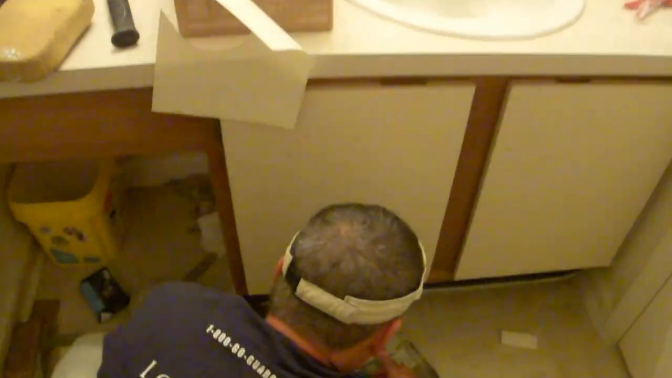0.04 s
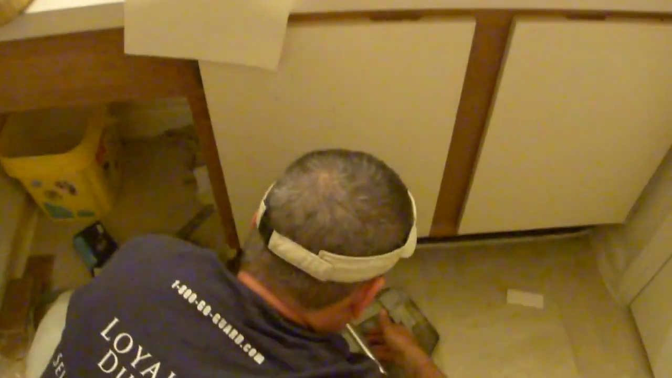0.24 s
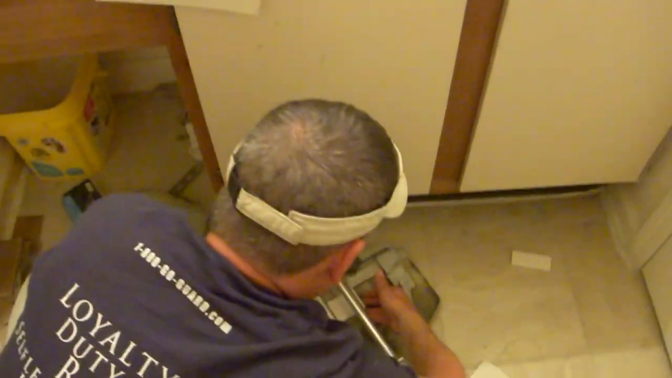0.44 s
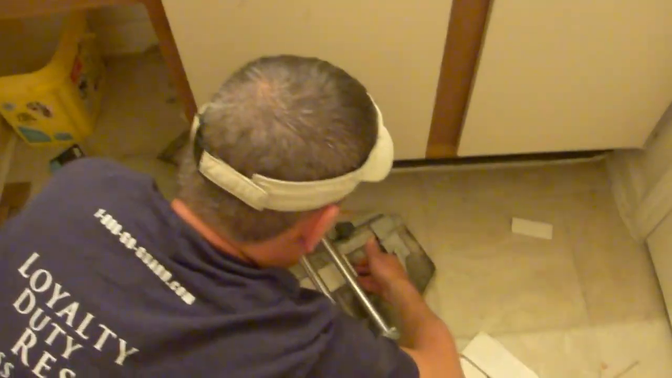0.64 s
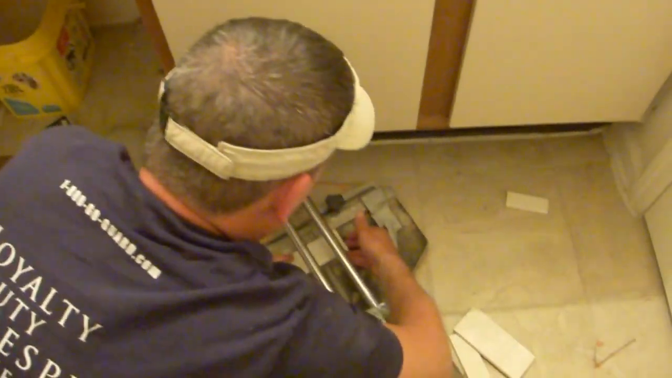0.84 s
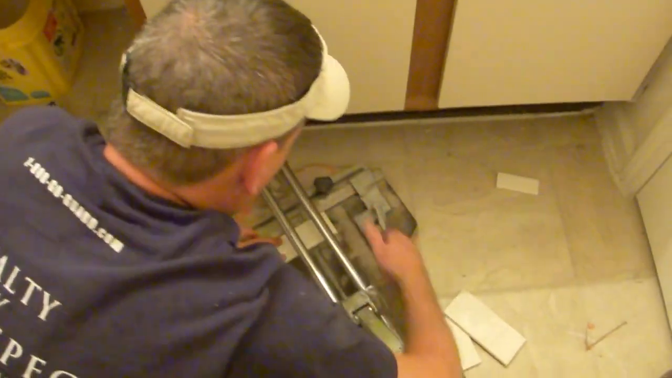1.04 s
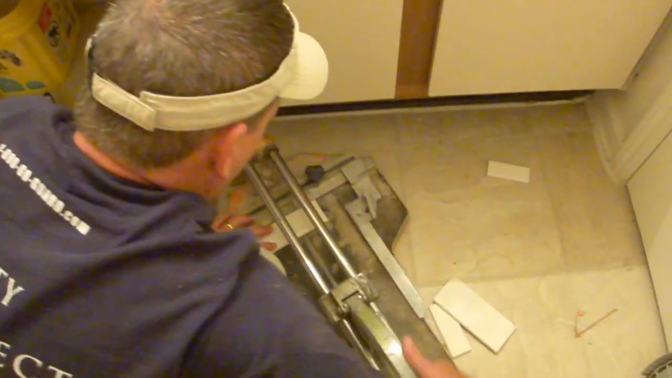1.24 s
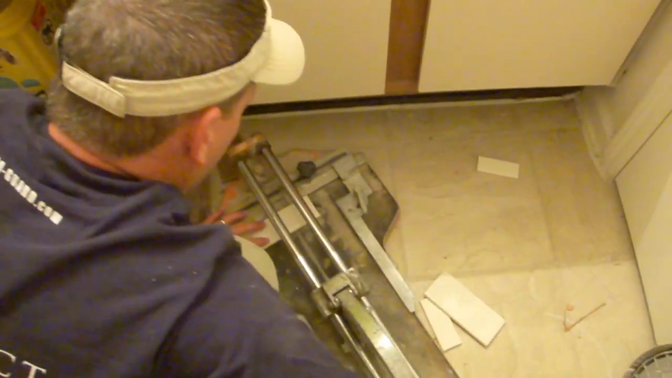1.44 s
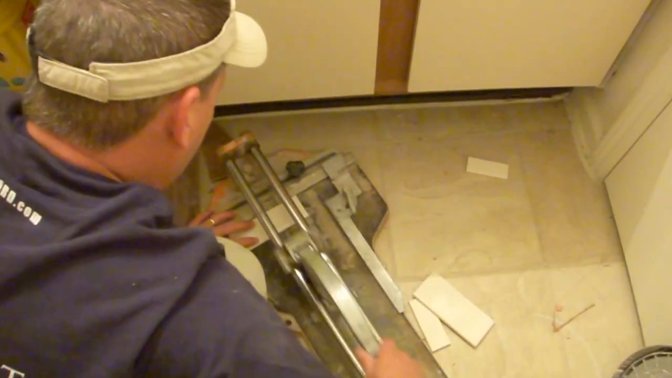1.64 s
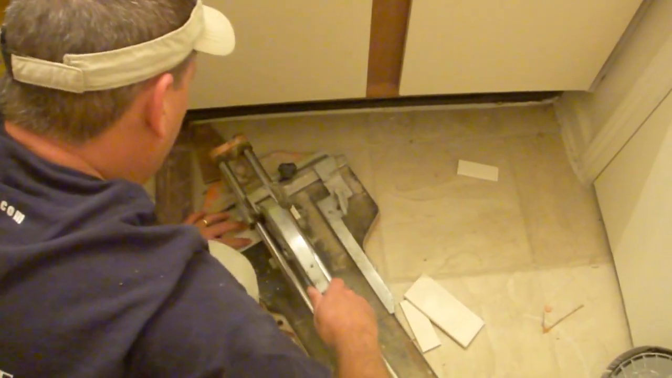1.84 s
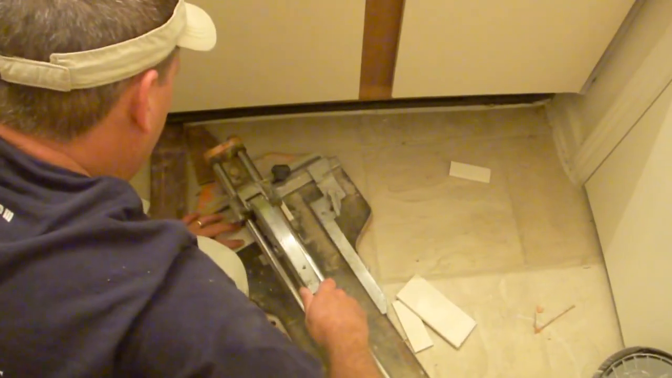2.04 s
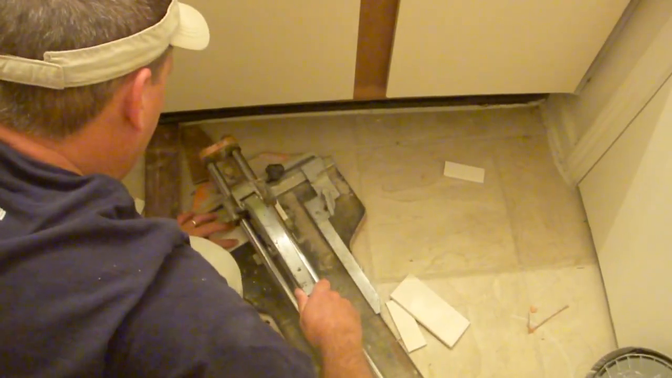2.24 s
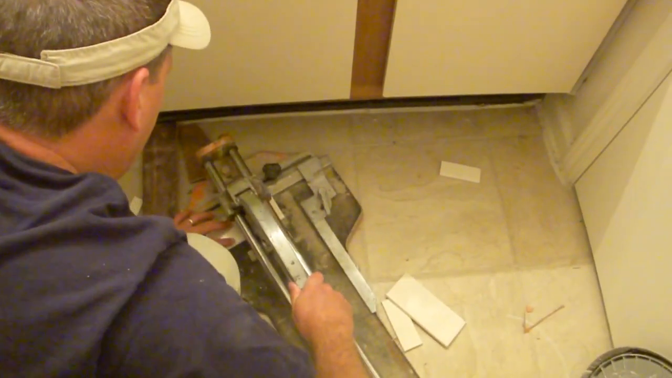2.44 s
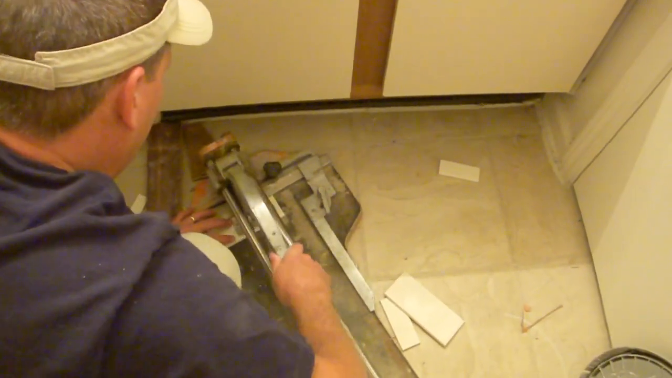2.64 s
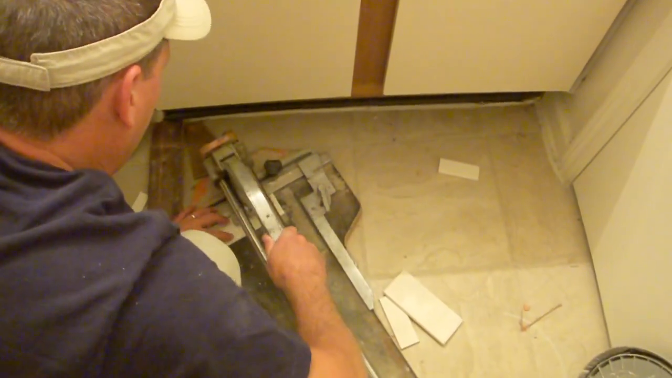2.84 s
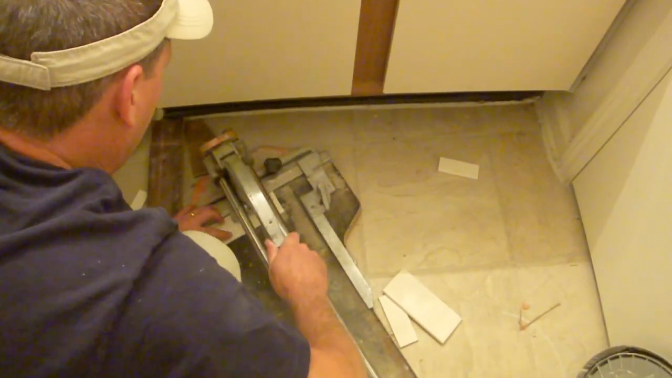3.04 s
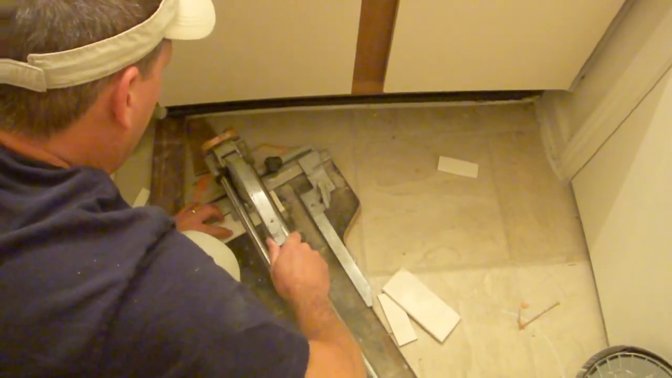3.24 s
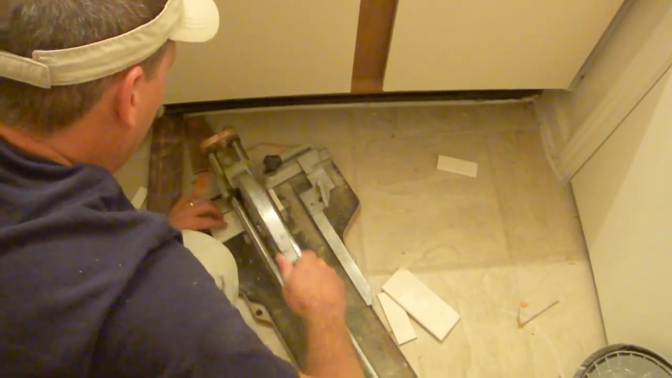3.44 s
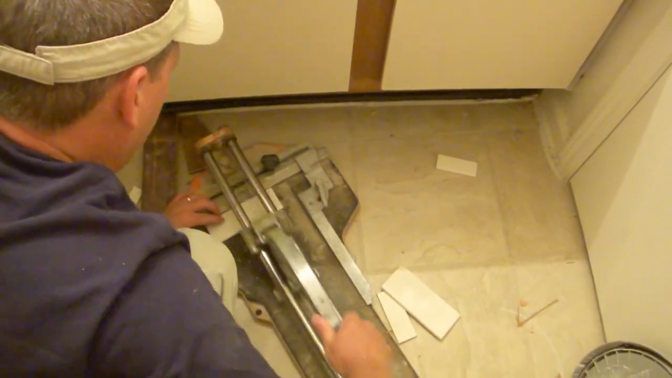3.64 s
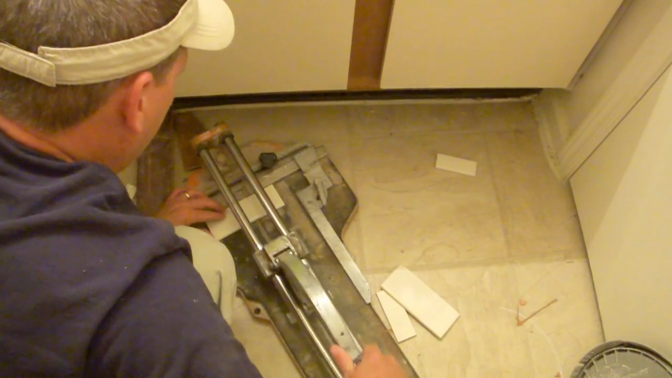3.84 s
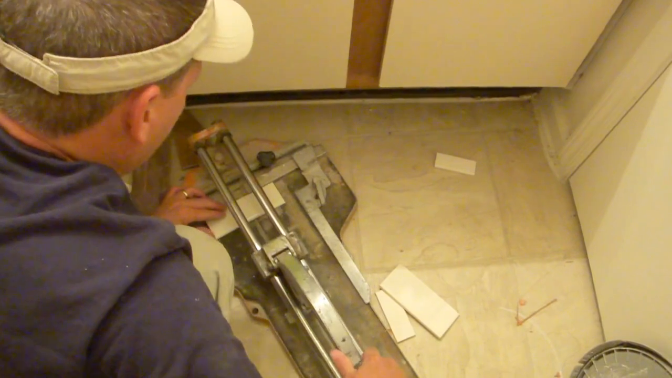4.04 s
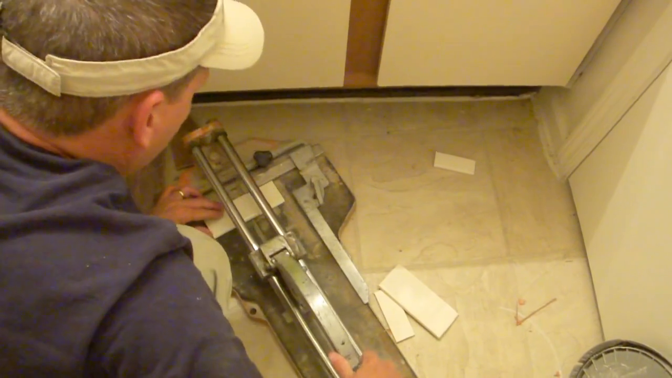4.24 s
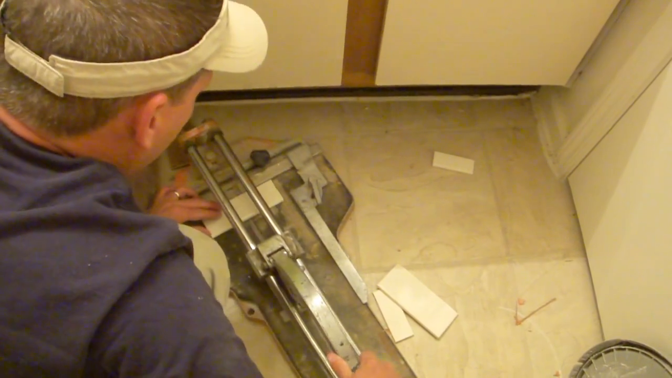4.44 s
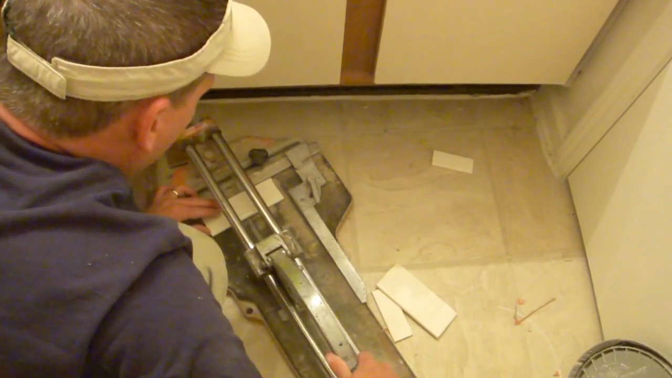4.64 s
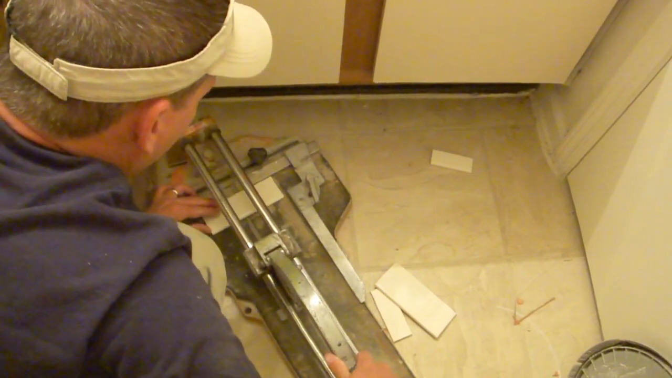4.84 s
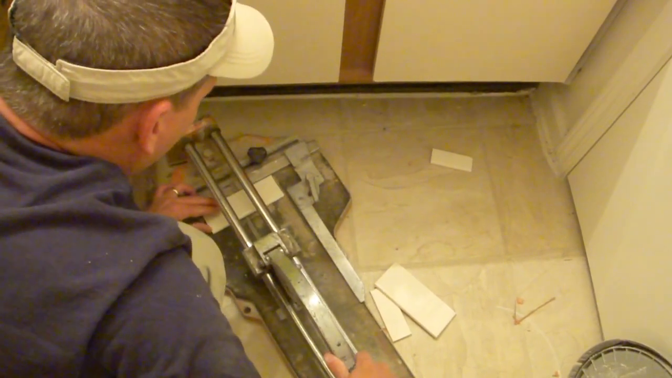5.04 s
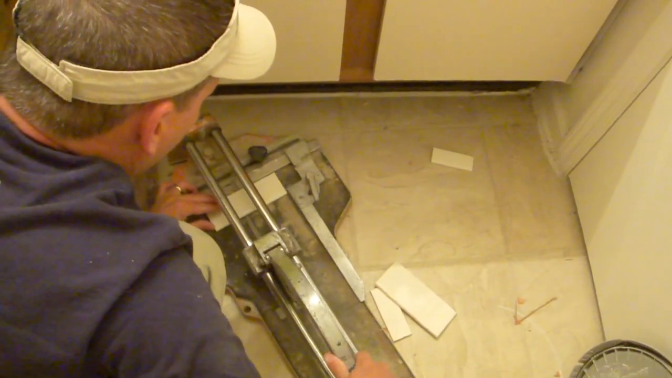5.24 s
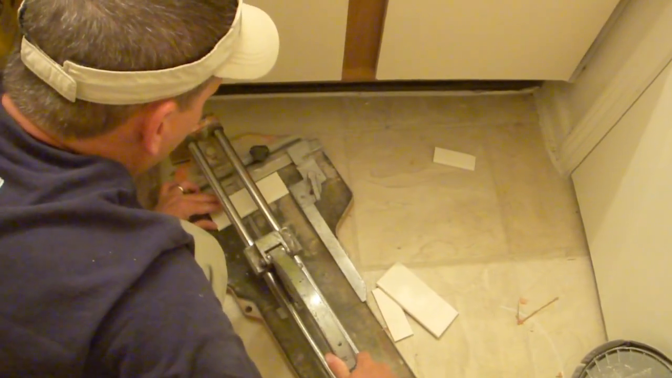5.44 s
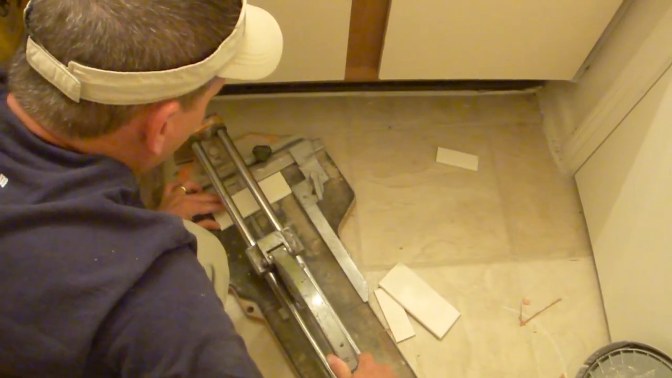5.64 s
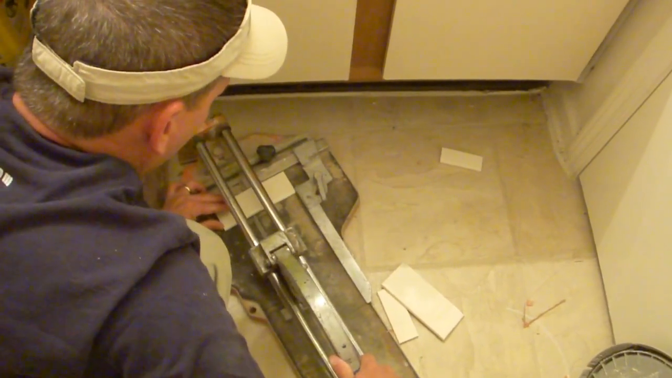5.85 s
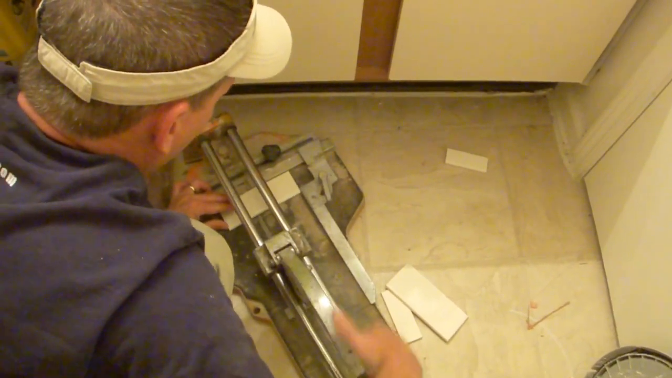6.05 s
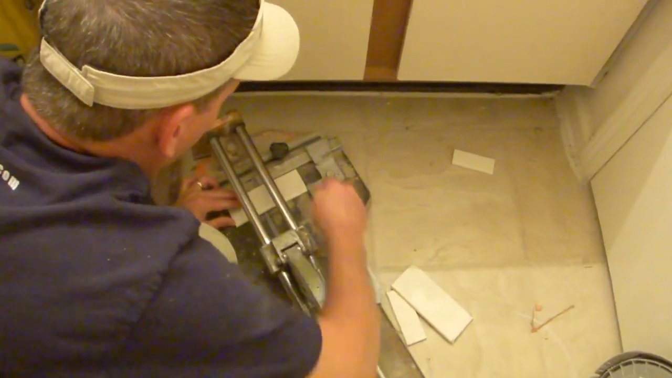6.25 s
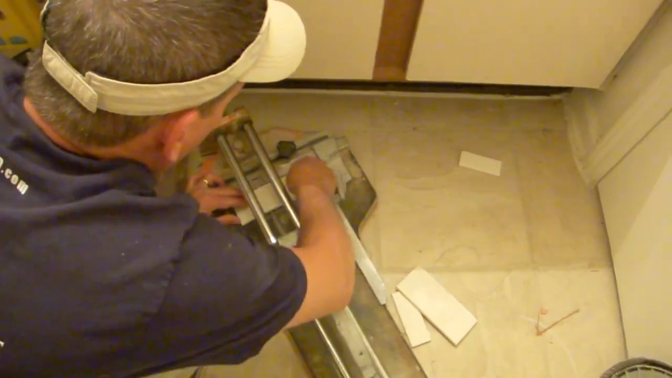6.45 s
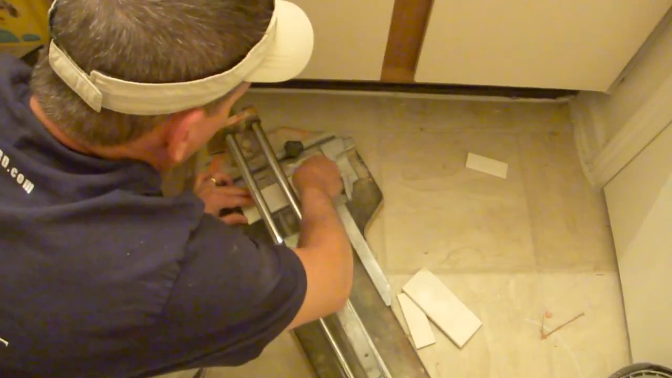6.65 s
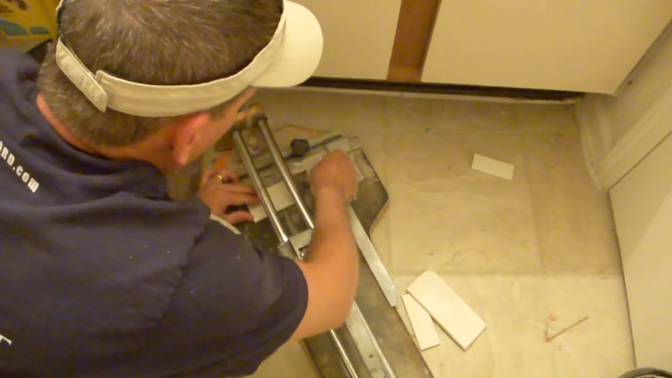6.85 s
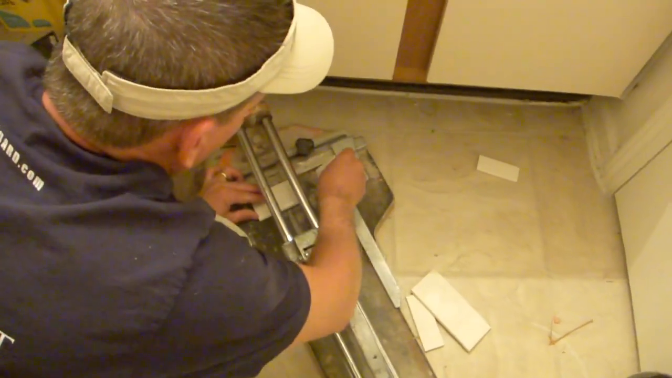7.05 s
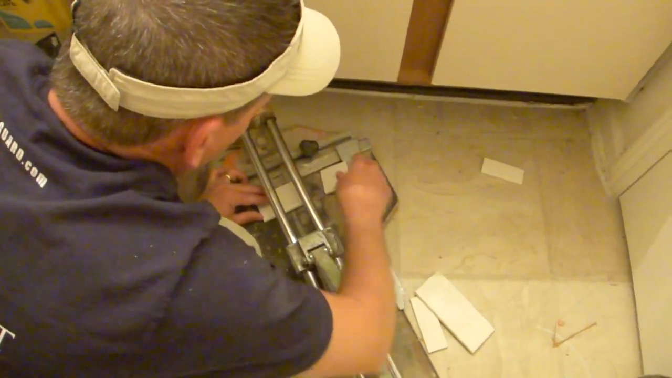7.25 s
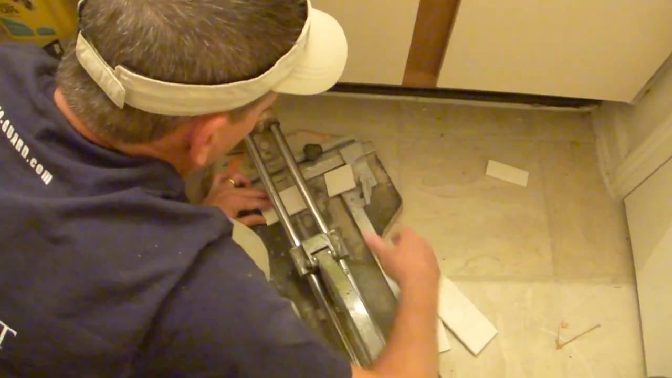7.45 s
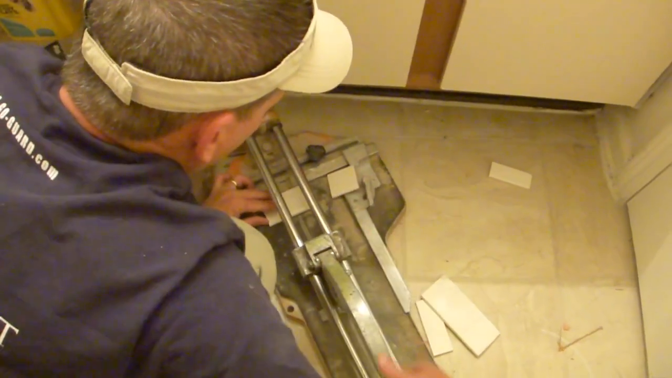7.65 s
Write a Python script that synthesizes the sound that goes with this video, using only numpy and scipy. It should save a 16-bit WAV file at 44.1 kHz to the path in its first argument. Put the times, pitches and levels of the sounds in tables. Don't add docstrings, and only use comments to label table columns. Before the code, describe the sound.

A manual tile cutter is worked at close range by thin-sounding small microphones. Soft scuffs come first, then a bumpy metal roll, knocks, a brief crushing scrape of glaze, hard handle blows and another rolling stroke. A quieter passage has faint tile scuffs and ticks, then a solid knock, scraping and glassy tile clinks. Short bright room reverberation, faint hiss and hum.

```python
import sys
import numpy as np
from scipy import signal
from scipy.fft import rfft, irfft, next_fast_len
from scipy.io import wavfile
from scipy.ndimage import map_coordinates

SR = 44100
rng = np.random.default_rng(int(sys.argv[2]) if len(sys.argv) > 2 else 0)


def rack_gain(trim_db):
    fader = np.asarray(trim_db, float)
    return 10 ** (fader / 20)


def store_wav(level_fs):
    pcm = np.round(np.clip(np.atleast_2d(level_fs), -1, 1) * 32767)
    wavfile.write(sys.argv[1], SR, pcm.T.astype(np.int16))


N = 340011
T = np.arange(N) / SR


def unit(x):
    return x / np.sqrt(np.mean(x ** 2) + 1e-20)


def along(points, hz):
    f, v = np.transpose(points)
    return np.interp(np.log(hz + 1), np.log(f + 1), v)


def wobble(rate):
    return map_coordinates(rng.standard_normal(int(N * rate / SR) + 4), [T * rate])


def filtered(x, response):
    m = next_fast_len(x.shape[-1] + SR // 2)
    spectrum = rfft(x, m) * response(np.fft.rfftfreq(m, 1 / SR))
    return irfft(spectrum, m)[..., :x.shape[-1]]


def body(modes):
    def response(f):
        total = 0
        for k, (centre, width, db) in enumerate(modes):
            resonance = 1j * f * width / (centre * centre - f * f + 1j * f * width)
            total = total + (-1) ** k * rack_gain(db) * resonance
        return total
    return response


def colour(spectrum):
    return lambda hz: rack_gain(along(spectrum, hz))


def band(centre_hz, q):
    return lambda f: (1j * f * centre_hz / q / (centre_hz ** 2 - f * f + 1j * f * centre_hz / q)) ** 2


def grains(per_s, spread_db):
    touch = rng.random(N) < per_s / SR
    return touch * rng.standard_normal(N) * rack_gain(spread_db * rng.standard_normal(N))


def pair(alike, hz):
    turn = np.arccos(np.clip(along(alike, hz), -1, 1)) / 2
    return np.array([np.cos(turn), np.sin(turn)])


def swells(rows, rise_db_per_s, fall_db_per_s, sag_db_per_s):
    start, held, db = np.transpose(rows)[:3, :, None]
    since = T - start
    rise = rise_db_per_s * np.minimum(since, 0)
    sag = sag_db_per_s * np.clip(since, 0, held)
    fall = fall_db_per_s * np.maximum(since - held, 0)
    return rack_gain(db + rise - sag - fall)


# freq_hz, gain_db
MIC = [(500, 6), (10500, 4.5), (12200, -4), (12900, -36), (15300, -35), (16200, -48)]


def mic(hz):
    bass_loss_hz = 273
    return colour(MIC)(hz) * (1j * hz / (bass_loss_hz + 1j * hz)) ** 2


# freq_hz, density_db
AIR = [(12, -57), (20, -32), (91, -20), (113, -13), (262, -2.5), (293, -2), (825, -1.5), (1220, -2.5),
       (1370, -4.5), (2200, -8), (10500, -19.5), (14700, -14), (15500, -60)]
# freq_hz, likeness (-1 to 1)
AIR_ALIKE = [(60, 0.39), (180, -0.62), (550, -0.37), (1650, -0.27), (4970, -0.022), (12000, 0.053)]
# freq_hz, level_db (rms)
HUM = [(120, -78)]


def air():
    noise = rng.standard_normal((2, N))
    mid, side = filtered(noise, lambda hz: rack_gain(along(AIR, hz) + along(MIC, hz)) * pair(AIR_ALIKE, hz))
    hiss = np.array([mid + side, mid - side]) / np.std(mid)
    hum = sum(rack_gain(db + 4.5 + 0.32 * wobble(3.4)) * np.sin(2 * np.pi * hz * T) for hz, db in HUM)
    return rack_gain(-51 + 0.087 * wobble(5.3)) * hiss + hum


# start_s, held_s, rub_db, hiss_db (re rub), tile_ring_db (re rub)
SLIDES = [(0, 0.069, -39.5, 3.5, -40), (.33, 0.23, -51.5, 3, -40), (.65, 0.04, -53, -2, -45),
          (1.02, 0.043, -48.5, -2, -54), (1.318, 0.022, -51.5, 8.5, -40), (4.03, 0.11, -44.5, 6.5, -29),
          (4.18, 0.1, -44, 7, -11), (4.3, 0.04, -51, 0, -3), (4.49, 0.057, -50.5, -10, -4.5),
          (4.6, 0.029, -56.5, -10, -6), (4.715, .2, -42, 1.5, -10), (5.105, 0.016, -76, -1, -13),
          (5.219, 0.072, -39.5, 1, -11.5), (5.49, 0.3, -65, -6, -13), (5.69, 0.011, -48, 1, -12.5),
          (6.09, 0.059, -57, -14, -40), (6.15, 0.032, -60, 20, -40), (6.7, .02, -56, -2, -13),
          (6.74, 0.12, -69, 8, -10), (6.82, 0.16, -46.5, -3, -3.5), (6.995, 0.019, -65, -11, -31),
          (7.105, 0.024, -52, -21, -41), (7.15, 0.03, -52, -21, -32), (7.235, 0.033, -57, -28.5, 2)]
# freq_hz, density_db
RUB = [(120, -32), (200, 8.5), (637, -2.5), (739, -11), (1080, 7.5), (1270, -6), (4550, -16), (5000, -5),
       (6500, -40), (11000, -120)]
# freq_hz, density_db
HISS = [(1760, -62), (3000, -55), (4090, 5.5), (5960, 6), (10200, -0.5), (13600, -18), (15000, -36)]
# freq_hz, width_hz, level_db
BASE = [(200, 134, -13.5), (287.4, 36, -3.5), (350, 42, -8.5), (440, 58, -9.5), (507, 28, -2.5),
        (566.4, 32, -1.5), (662, 80, 1), (853, 52, -2), (1042, 83, -1.5), (1278, 128, -1),
        (1428, 175, -2.5), (1560, 304, 0.5), (1720, 460, -4), (2100, 700, -7), (2520, 570, -13.5)]
# freq_hz, width_hz, level_db
PRESSED = [(4525, 28, 3), (5490, 70, -4), (6510, 32, 0), (7510, 40, -1), (8920, 100, -10), (9080, 72, -9),
           (10720, 80, 0.5), (11190, 60, -4)]


def shuffle():
    moves = swells(SLIDES, rise_db_per_s=220, fall_db_per_s=230, sag_db_per_s=39)
    hissing, ringing = rack_gain(np.transpose(SLIDES)[3:]) @ moves
    drag = rack_gain(2.2 * wobble(30)) * grains(per_s=7500, spread_db=3)
    rub = unit(filtered(drag, colour(RUB))) + 0.71 * unit(filtered(drag, body(BASE)))
    scuff = unit(filtered(drag, band(2390, q=0.82)))
    hiss = unit(filtered(grains(per_s=6300, spread_db=3), colour(HISS)))
    catches = ringing * unit(grains(per_s=700, spread_db=3))
    ring = sum(filtered(catches * rack_gain(2.9 * wobble(22)), body([mode])) for mode in PRESSED)
    rubbing = moves.sum(0) * (1.04 * rub + rack_gain(3) * scuff)
    return rack_gain(-12.5) * (rubbing + rack_gain(-2) * hissing * hiss) + 8 * ring


def tones(rows, t60_s):
    glassy_hz, low_damping = 3000, 0.55
    out, t = np.zeros(N + SR), np.arange(SR // 4) / SR
    for (s, hz, db, lasts), noise in zip(rows, rng.standard_normal((len(rows), len(t)))):
        decay_s = t60_s if hz > glassy_hz else t60_s * low_damping
        tone = np.sin(2 * np.pi * hz * t) * rack_gain(-60 * t / decay_s)
        push = noise * rack_gain(-9 * (t / lasts) ** 2)
        sung = signal.fftconvolve(push, tone)[:len(t)]
        out[round(s * SR):][:len(t)] += rack_gain(db) * sung / np.abs(sung).max()
    return out[:N]


# start_s, pitch_hz, level_db, push_s
SHORT_TONES = [(0.056, 470, -44.5, 0.051), (1.03, 2440, -49, 0.013), (1.313, 3500, -43.5, .04),
               (1.31, 6060, -51, 0.013), (1.308, 10850, -48.5, .033), (1.441, 730, -38, 0.012),
               (1.551, 743, -38, 0.016), (2.236, 5600, -50, 0.018), (2.238, 7450, -52, 0.018),
               (2.448, 5700, -46, .02), (2.452, 7440, -46.5, 0.016), (2.456, 11100, -44.5, 0.044),
               (2.64, 320, -25, 0.032), (3.118, 8000, -41, 0.013), (3.515, 440, -28, 0.065),
               (3.556, 5300, -25, 0.0043), (3.852, 6410, -41.5, 0.056), (6.219, 900, -28, 0.019),
               (6.232, 2100, -30, 0.0052), (6.249, 624, -27.5, 0.053), (6.804, 5500, -40, 0.033),
               (6.815, 2320, -32, 0.0053), (6.815, 4650, -42, 0.039), (6.958, 4450, -47, 0.021),
               (7.144, 2490, -40, 0.0059), (7.22, 830, -34, 0.017), (7.234, 1560, -29.5, 0.15),
               (7.275, 7512, -33, 0.03), (7.274, 4530, -26, 0.038), (7.278, 1214, -23, 0.096)]


def short_tones():
    return tones(SHORT_TONES, t60_s=0.027 * 1.54)


def blows(events, seat, modes, snap_db, ring_db):
    pushes, t = np.zeros((5, N + SR)), np.arange(SR // 40) / SR
    noises = rng.standard_normal((len(events), 4, len(t)))
    for (s, db, crack_db, sharp_db, low_db), noise in zip(events, noises):
        rattle = np.array([[0.1], [0.2], [0.25], [0.05]])
        push = rattle * noise * rack_gain(-60 * t / 0.036)
        push[:, 0] = [0.77, 0.71, 0.94, 1]
        i = round((s + 0.001) * SR)
        levels = rack_gain(db + np.array([0, crack_db, sharp_db + snap_db, sharp_db, low_db]))
        pushes[:, i:i + len(t)] += levels[:, None] * np.vstack([push, push[:1]])
    thud, crack, snap, ring, boom = pushes[:, :N]
    cracks = rack_gain(13) * filtered(crack, lambda hz: band(2600, q=0.9)(hz) / (1 + 1j * hz / 4000))
    cracks = cracks + rack_gain(3) * filtered(snap, band(7000, q=0.5))
    blunt = lambda hz: 1 / (1 + 1j * hz / 3500) * (1j * hz / (260 + 1j * hz)) ** 2
    low = [mode for mode in seat if mode[0] < 760]
    upper_thud = (-1) ** len(low) * filtered(thud, body(seat[len(low):]))
    thuds = filtered(boom, body(low)) + upper_thud
    return rack_gain(26) * filtered(thuds, blunt) + cracks + rack_gain(ring_db) * filtered(ring, body(modes))


# crack_db, sharpness_db, low_modes_db
KNOCKS = [(0.059, -45, 14, -10, 3), (0.472, -41, -13, -15, 12), (1.359, -35.5, -24, -22, 4),
          (1.447, -43, -21, -25, 0), (1.56, -44, 0, -20, 0), (1.604, -43, -12, -6, 0),
          (1.945, -8, -13, -28, -7), (2.235, -21, -7, -10, 3), (2.274, -39.5, 5, 1, -3),
          (2.396, -28.5, -1.5, -2.5, 3.5), (2.441, -30.5, -23, -23, 1.5), (2.505, -13, -10, -18, -5.5),
          (2.521, -60, 0, 8, 0), (2.569, -23.5, -4, -2, 2), (2.754, -2.5, 2, -6.5, -18),
          (2.884, -10, -8, -24, -7), (3.111, -31.5, -2, -7, -3), (3.139, -11.5, -8.5, -35, 5),
          (3.239, 0, 0.5, -5, 1.5), (3.247, -13.5, 3, -14, 9), (3.283, -12.5, -2, -30, 6.5),
          (3.391, -11.5, -11, -28, 1), (3.441, -8, -3.5, -42, -4), (5.712, -28, -11, -20, 1),
          (6.230, -5, -6, -27, -2), (6.243, -8, 5, -19, 2.5)]
# freq_hz, width_hz, level_db
RAILS = [(4100, 84, 8.2), (5235, 105, 9.4), (7850, 130, 5.7), (8490, 82, 1.4)]


def knocks():
    return blows(KNOCKS, BASE, RAILS, snap_db=-3, ring_db=15)


# start_s, pitch_hz, level_db, push_s
RINGS = [(2.705, 312, -19.5, 0.046), (2.765, 804, -21, 0.041), (2.762, 1265, -26, .035),
         (2.76, 7720, -45, 0.075), (2.88, 296, -24, .03), (2.9, 5250, -58, .1), (3.13, 7300, -50, .025),
         (3.242, 990, -17.5, 0.011), (4.17, 4650, -46, .07), (4.23, 5500, -52, 0.037),
         (4.305, 5470, -54, .04), (4.48, 10750, -49.5, .045), (6.245, 5120, -42, 0.04),
         (6.35, 640, -39.5, 0.026), (6.82, 5430, -47, 0.041), (6.83, 336, -37, 0.042),
         (6.86, 10750, -46, 0.054), (6.96, 1090, -41, 0.0098), (6.994, 1090, -37.5, 0.017),
         (6.994, 7520, -46, 0.014), (7.1, 330, -43, .04), (7.145, 590, -41, 0.04), (7.16, 330, -43, .03),
         (7.24, 8860, -47, 0.036), (7.24, 6500, -45, 0.03), (7.285, 590, -27, 0.051),
         (.47, 297, -45.5, 0.013), (1.39, 715, -49, 0.028), (1.485, 690, -45, 0.021),
         (1.57, 1050, -48, 0.018), (1.605, 690, -43, 0.015), (1.95, 680, -25, 0.036),
         (2.237, 550, -37, .03), (2.24, 350, -43.5, 0.017), (2.756, 2270, -25, .015),
         (3.45, 702, -26.5, .03), (3.52, 460, -27, 0.12), (4.2, 4560, -50, 0.11), (4.33, 6550, -57, 0.054),
         (5.714, 1800, -47, 0.022), (6.235, 294, -38, 0.029), (6.7, 4540, -59, 0.043),
         (6.76, 7512, -50, .04), (6.82, 4500, -42, 0.083), (6.96, 4540, -37, 0.041), (7.1, 4530, -56, 0.1),
         (7.275, 4540, -20, 0.059), (7.276, 7520, -24.5, 0.071)]


def long_rings():
    return tones(RINGS, t60_s=0.07)


# start_s (full speed), held_s, rumble_db, chatter_db (re rumble), base_load_db
STROKES = [(1.37, .24, -69.5, 13, -4), (1.655, 0.021, -43, 5, 4), (1.704, .25, -21.5, -2.5, -11.5),
           (2.47, 0.15, -52.5, 15, 12.5), (2.62, 0.12, -26, -4, 3), (2.77, 0.093, -30, -5.5, -1),
           (3.143, 0.012, -36, -19, 13), (3.257, 0.058, -32, 5, 3.5), (3.511, 0.039, -30.5, -7, -23),
           (3.581, 0.14, -20, -7.5, -28), (3.76, 0.096, -27.5, -4.5, -23), (3.88, 0.031, -42, 10, -16)]
# freq_hz, density_db
CHATTER = [(88, -72), (150, -47), (264, -108), (406, -6.5), (662, -1.5), (805, 2), (1240, 6.5),
           (1530, -14.5), (10200, -35), (16000, -25)]


def carriage():
    speed = swells(STROKES, rise_db_per_s=353, fall_db_per_s=310, sag_db_per_s=19)
    bright, load = rack_gain(np.transpose(STROKES)[3:]) @ speed
    rolling = speed.sum(0)
    judder = rack_gain(2.4 * wobble(45) + 1.5 * wobble(170))
    impacts = judder * grains(per_s=3000, spread_db=5)
    rumble = unit(filtered(impacts, body(BASE[4:]))) + 0.61 * unit(filtered(impacts, colour(CHATTER)))
    rumble = rumble + 0.62 * unit(filtered(impacts, band(1800, q=1.2)))
    rumble = rumble + rack_gain(-3.5) * unit(filtered(grains(per_s=70, spread_db=5), body(BASE[5:])))
    brake_s = 0.064
    slowing = np.maximum(np.roll(rolling, round(brake_s * SR)) - rolling, 0)
    groan = slowing * unit(filtered(impacts, body(BASE[:1])))
    deep = unit(filtered(impacts, body(BASE[:4])))
    high = lambda hz: colour(CHATTER)(hz) * (hz / 2600) ** 3 / (1 + (hz / 2600) ** 3)
    chatter = unit(filtered(judder * grains(per_s=7000, spread_db=0), high))
    low_part = 1.325 * rolling * rumble + rack_gain(-9) * groan + rack_gain(-2.5) * load * deep
    return rack_gain(-6) * (low_part + bright * chatter)


# crack_db, sharpness_db, low_modes_db
JOLTS = [(1.639, -40, -12, -30, -1), (1.672, -25, -12, -30, 0), (1.696, -22, -6, -10, -3),
         (1.724, -18, -22, -35, -5), (1.734, -14, -24, -35, 5), (1.769, -6.5, -16, -35, 1),
         (1.8, -11, -1.5, -20, 5), (1.826, -5.5, -18, -30, -3), (1.859, -11, -16, -35, -1),
         (2.605, -23, -4, -20, 7), (2.656, -16, -6, -20, 1), (2.764, -12.5, -4, -25, -1.5),
         (2.877, -16, -10, -33, -3), (2.891, -16.5, -21, -32, 6), (2.922, -27, -22, -30, -2),
         (3.125, -25, -6, -20, -3), (3.132, -18, -11, -23, 6), (3.149, -13.5, -18, -30, -0.5),
         (3.159, -24, -17, -34, 6), (3.172, -28, -24, -30, 3), (3.296, -12, 4, -30, -1),
         (3.514, -22, -23, -35, 6), (3.544, -12.5, -26, -35, -3), (3.62, -11, -13, -35, -8),
         (3.69, -7.5, -20, -35, 0), (3.768, -11, -23, -35, 0), (3.832, -15.5, -21.5, -35, 3.5),
         (6.251, -15, -11, -25, -3), (6.262, -22, -14, -28, 1), (6.292, -20, -18, -30, -3)]


def jolts():
    return blows(JOLTS, BASE, RAILS, snap_db=-3.5, ring_db=12)


# crack_db, sharpness_db, low_modes_db
CLINKS = [(2.474, -38, 8, -14, 2), (4.135, -36.5, -6, -11, -1), (4.304, -40, -9, -3, 2),
          (4.59, -55, 5, 16.5, 0), (4.72, -41, 1, -6, -2), (4.999, -52, 11, 0, 6),
          (5.101, -49.5, -8, 4.5, 0), (5.326, -42, 11.5, 2, -2), (5.489, -47.5, -9, -2.5, 2),
          (5.561, -49.5, 6, -4, 0), (5.639, -40, -5, -11, -1), (6.813, -15, -2, -18.5, -1),
          (6.959, -24, -0.5, -11, -4.5), (6.992, -24.5, -7, -23, -0.5), (7.101, -34.5, -14, -15.5, 3),
          (7.146, -34.5, -12, -18, 3), (7.219, -21, 3.5, -45, -8), (7.274, -6, 5.5, -8.5, -7)]
# freq_hz, width_hz, level_db
SEAT = [(342, 42, -2.5), (460, 37, -7), (610, 61, 2.5), (832, 27, -5), (1050, 50, 0), (1234, 43, -1.5),
        (1470, 220, -7.5), (2320, 210, -1.5), (2320, 35, -18), (2840, 45, -26), (4040, 32, -33)]
# freq_hz, width_hz, level_db
TILE = [(4520, 26, 7), (5460, 150, -9.5), (6510, 48, 0), (7512, 26, 5.5), (8750, 120, -11), (9020, 90, -12),
        (10700, 110, -2), (11190, 80, -1)]


def clinks():
    return blows(CLINKS, SEAT, TILE, snap_db=-1, ring_db=35)


# start_s (full bite), held_s, grit_db
WHEEL = [
    (2.603, 0.055, -27.5),
    (2.645, 0.033, -23.5),
    (2.695, 0.04, -24),
]
# freq_hz, density_db
GRIT = [(880, -42), (1500, -24), (2940, -1.5), (4160, -14), (6310, -9), (8320, -10), (12600, 0),
        (16000, -82)]
# freq_hz, width_hz, level_db
GLAZE = [(3980, 300, 7.5), (5160, 150, -21), (6000, 250, -12), (8000, 340, 10), (9350, 150, -21),
         (10500, 250, -19), (11200, 390, 1)]
# freq_hz, width_hz, level_db
GLAZE_LATE = [(4350, 320, 11), (5600, 150, -19), (6500, 250, -14), (8700, 420, -3), (10200, 300, -8),
              (11400, 460, 7), (12200, 390, -1)]


def wheel():
    bite = swells(WHEEL, rise_db_per_s=700, fall_db_per_s=900, sag_db_per_s=42).sum(0)
    crushing = rack_gain(3 * wobble(70)) * grains(per_s=2500, spread_db=4.5)
    early = unit(filtered(crushing, body(GLAZE)))
    late = unit(filtered(crushing, body(GLAZE_LATE)))
    turn = np.clip((T - 2.665) / 0.05, 0, 1) * np.pi / 2
    ring = early * np.cos(turn) + late * np.sin(turn)
    grit = unit(filtered(crushing, colour(GRIT)))
    return rack_gain(-9.5) * bite * (1.66 * grit + 1.62 * ring)


# freq_hz, t60_s
ROOM = [(150, 0.095), (500, 0.44), (2000, 0.35), (6000, 0.4), (12000, 0.21)]
# freq_hz, level_db
ROOM_DB = [(300, 4), (1500, -2.5), (4000, -6), (10000, -2)]
# freq_hz, likeness (-1 to 1)
ROOM_ALIKE = [(100, 0.87), (400, 1), (1200, 0.9), (3000, 0.58), (6000, 0.26), (12000, 0.02)]


def room(x):
    out, hop = np.zeros((2, N + SR)), SR * 3 // 10
    for i in range(0, N, hop):
        hz, t, z = signal.stft(rng.standard_normal((2, SR * 3 // 5)), SR, nperseg=256)
        decay_db = along(ROOM_DB, hz)[:, None] - 60 * t / along(ROOM, hz)[:, None]
        fade = rack_gain(decay_db) * pair(ROOM_ALIKE, hz)[:, :, None]
        mid, side = signal.istft(z * fade, SR, nperseg=256)[1]
        tail = np.array([mid + side, mid - side])
        wet = signal.fftconvolve(x[None, i:i + hop], tail / np.linalg.norm(tail[0]), axes=1)
        out[:, i + 130:i + 130 + wet.shape[1]] += wet
    return out[:, :N]


def scene():
    slides = shuffle() + carriage() + wheel()
    hits = short_tones() + knocks() + long_rings() + jolts() + clinks()
    direct = slides + 1.9 * hits
    direct = np.array([np.roll(direct, 1), direct])
    return direct * rack_gain([[-2.6], [-3.4]]) + rack_gain([[0.4], [-0.4]]) * room(slides + hits)


def band_limit(x):
    return signal.sosfilt(signal.butter(12, 16290, fs=SR, output="sos"), x)


def record(dry):
    x = filtered(dry, mic)
    x = x / (1 + np.abs(x / 0.92) ** 4) ** (1 / 4)
    x = filtered(x, lambda hz: (1j * hz / (130 + 1j * hz)) ** 3 * (hz < 16200))
    mix = np.clip(x + air(), -1, 1)
    return band_limit(mix)


dry = scene()
out = record(dry)
store_wav(out)
```